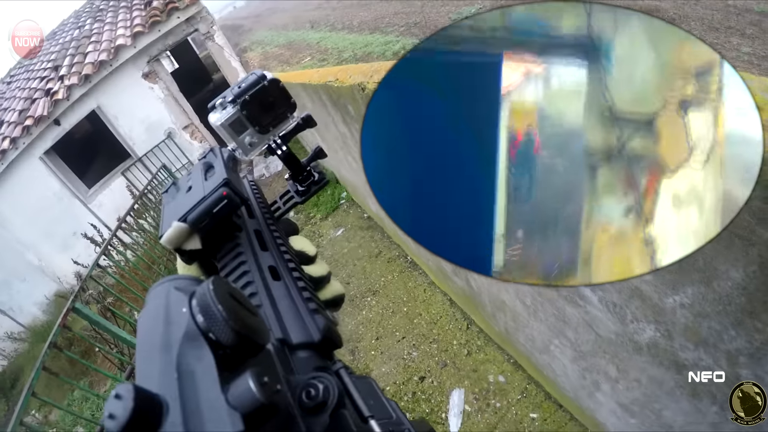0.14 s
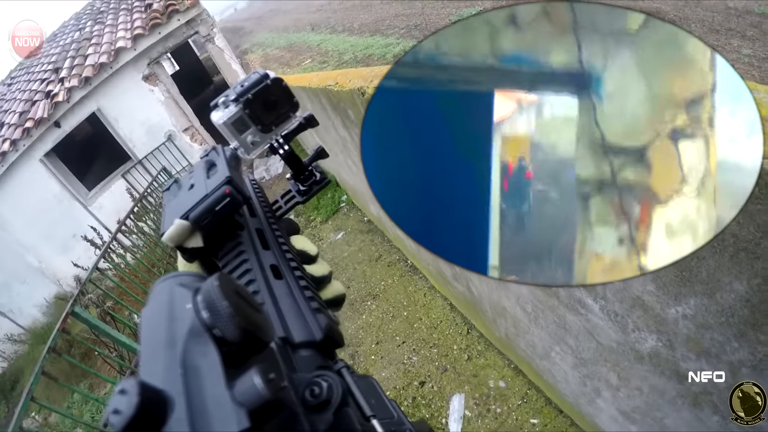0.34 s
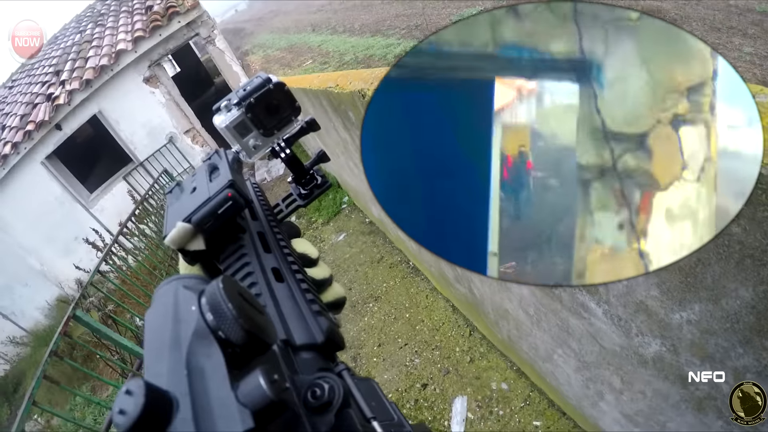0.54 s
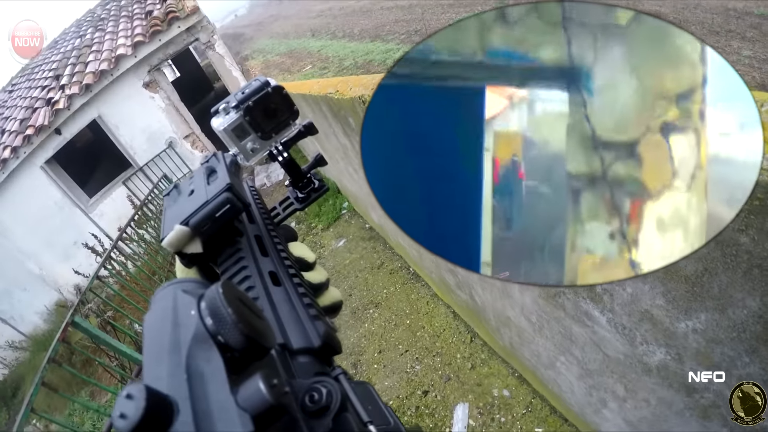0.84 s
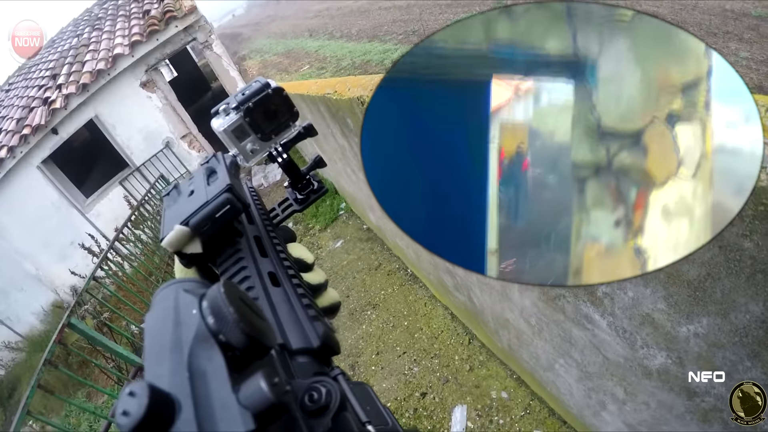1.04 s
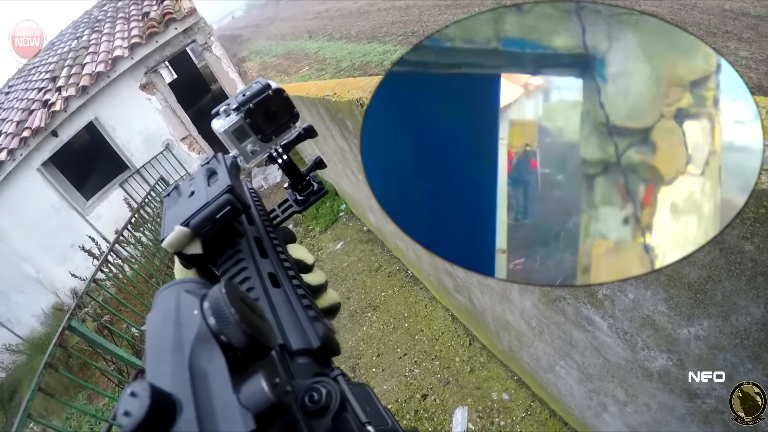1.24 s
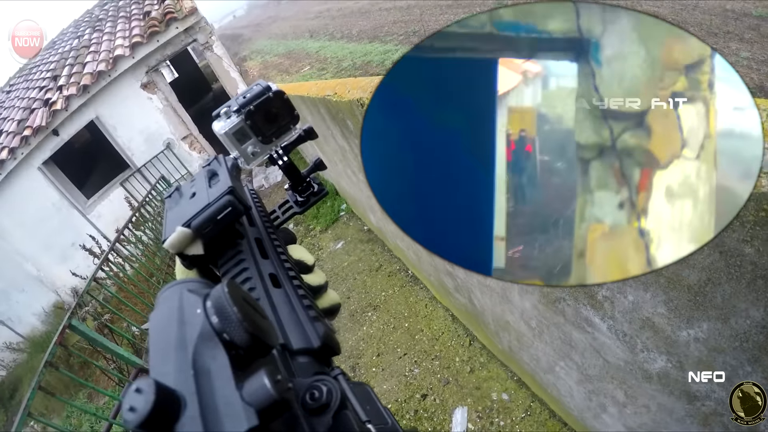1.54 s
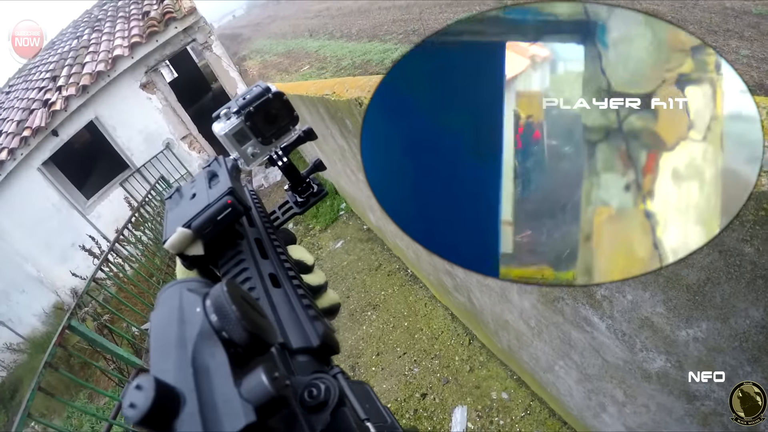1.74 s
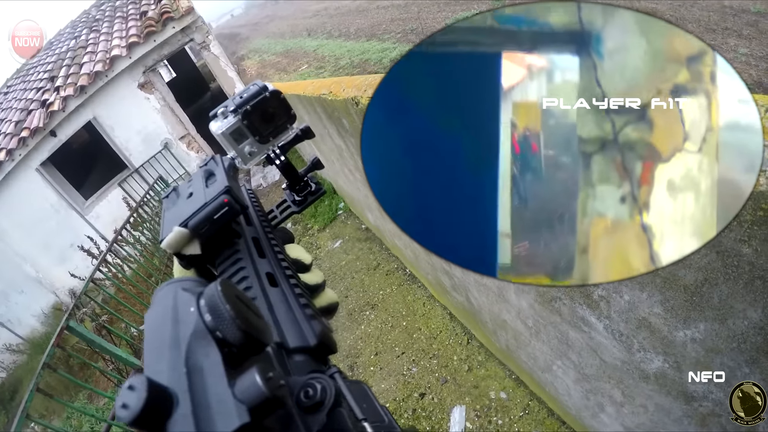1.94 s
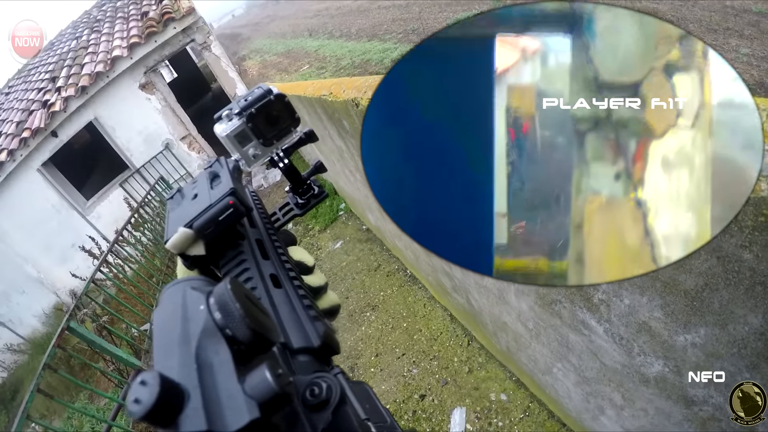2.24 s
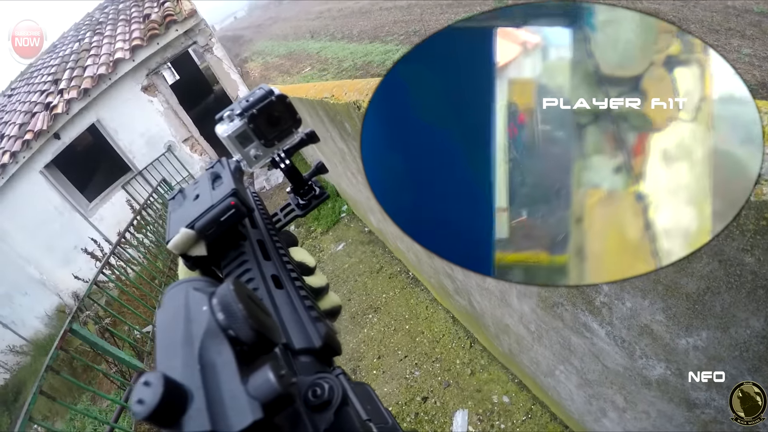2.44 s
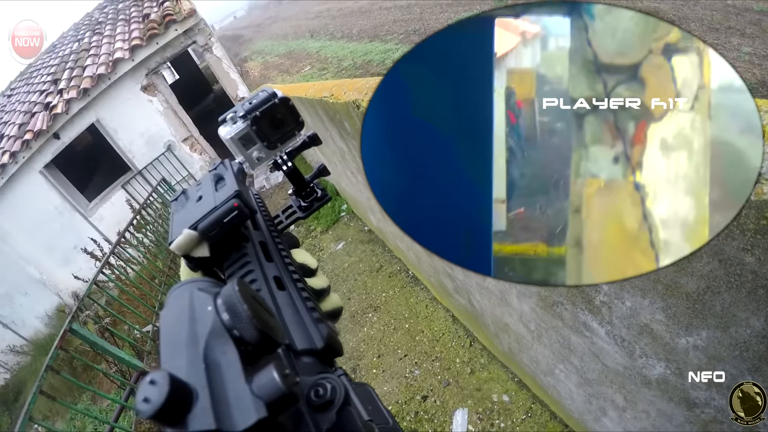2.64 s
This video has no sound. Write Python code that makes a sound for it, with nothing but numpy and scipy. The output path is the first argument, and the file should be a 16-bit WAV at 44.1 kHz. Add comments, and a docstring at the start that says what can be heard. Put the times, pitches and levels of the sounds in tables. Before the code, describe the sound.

Close by in a yard, an electric airsoft rifle snaps off a fast run of shots, stops for a moment, then fires five more. Gears whir and the piston slams each time, with a faint echo and soft handling bumps.

```python
"""Airsoft rifle in a yard

An electric airsoft rifle fires thirteen quick shots close by, with one short pause. In each cycle
the motor spins up, the gears drag the piston back along its toothed rack and let it go: the spring
zings, the gun recoils and the piston slams home. The trigger ticks between shots and one clack cuts in.
Walls and ground give a faint return, over low outdoor rumble and soft handling bumps."""
import sys
import numpy as np
from scipy import signal
from scipy.fft import rfft, irfft
from scipy.io import wavfile
from scipy.ndimage import uniform_filter1d

SR = 44100
rng = np.random.default_rng(int(sys.argv[2]) if len(sys.argv) > 2 else 0)


def waveform_to_disk(signal):
    """Save audio, clipped to [-1, 1], as 16-bit WAV at the path in sys.argv[1]."""
    frames = np.transpose(np.atleast_2d(signal))
    scaled = np.clip(frames, -1, 1) * 32767
    samples = np.round(scaled).astype(np.int16)
    wavfile.write(sys.argv[1], SR, samples)


N = 123479

# The firing pattern. Each row: piston slam time in seconds, motor lead and rack lead in seconds,
# trims in dB for rack, recoil, slam and stock ring, start click level in dB, stopping hum trim in dB.
SHOTS = [(.3222, .078, .044, 4, 5, 4, 4, -28, -8), (.5659, .088, .040, 0, 0, 1, 1, -42, -1),
         (.7195, .084, .042, 1, 0, 0, 0, -44, -1), (.8967, .085, .042, 0, 0, 1, 2, -44, -1),
         (1.0614, .084, .042, 0, -1, 0, 0, -36, 0), (1.2247, .085, .042, 0, -1, 0, -2, -44, 0),
         (1.3823, .085, .042, 0, -1, 0, -1, -44, 0), (1.5565, .084, .042, -1, -2, -1, -2, -42, 0),
         (1.8755, .087, .044, 2, 1, 2, 5, -35, -14), (2.043, .073, .037, 1, 1, 0, 3, -40, 0),
         (2.2393, .086, .042, 0, 1, 1, -1, -44, 0), (2.438, .085, .042, 0, 0, 1, 0, -34, -1),
         (2.6231, .085, .042, 1, 0, 0, -1, -39, 0)]
# Tone of the motor's starting click. Each row: frequency in Hz, relative level in dB.
START_CLICK_EQ = [(60, -23.5), (300, -2.5), (800, 7.5), (1500, -1), (3200, -5.5), (5000, -12.5),
                  (8000, -18.5), (10000, -35), (15000, -37.5)]
# Tone of the released spring. Each row: frequency in Hz, relative level in dB.
ZING_EQ = [(300, 0), (1000, -6), (2200, -14), (2650, -2.5), (3550, -2.5), (4150, -12.5), (4800, -33),
           (9000, -27.5), (15000, -59.5)]
# Ring of the stock and receiver. Each row: frequency in Hz, level before trim in dB, t60 in seconds.
STOCK_MODES = [(108, -49, 0.22), (272, -25, 0.1), (320.3, -18, 0.037), (627, -26, 0.11), (733, -12, 0.046),
               (848, -22, 0.072), (985, -19.5, 0.056)]
# The spring's thin after-ring. Each row: frequency in Hz, level before trim in dB, t60 in seconds.
SPRING_MODES = [(9790, -65.5, 0.48), (11670, -24, 0.04), (12100, -23, 0.049), (13200, -23, 0.037)]
def rifle():
    """Each cycle winds up, lets go and slams; the hard contacts all sound through the gearbox shell."""
    metal, body = np.zeros((2, N))
    for hit, motor_lead, rack_lead, rack_db, recoil_db, slam_db, stock_db, click_db, stop_db in SHOTS:
        start, release, flight_s = hit - motor_lead, hit - .021, .0224
        add(metal, start, strike(START_CLICK_EQ, click_db, hold_s=.0013, decay_s=.0049))
        add(metal, start, motor(release - start))
        add(body, start, grip_hum(length_s=.042, db=-31.5))
        add(metal, hit - rack_lead, rack(rack_db))
        add(metal, release, strike(TICK_EQ, db=-19, hold_s=.00089, decay_s=.0032))
        add(body, hit - flight_s, recoil(flight_s, recoil_db))
        add(metal, hit - .0138, strike(ZING_EQ, db=-16.5, hold_s=.0062, decay_s=.0012))
        add(metal, hit, slam(slam_db))
        add(body, hit, ring(STOCK_MODES, stock_db, detune=.01))
        add(body, hit, ring(SPRING_MODES, slam_db, detune=.00049))
        add(metal, hit + .0215, strike(GEAR_EQ, db=-25, hold_s=.0025, decay_s=.002))  # bounce
        add(body, hit + .029, grip_hum(length_s=.026, db=-31 + stop_db))
    trigger(metal)
    clack(metal)
    return shell(metal) + body


# Tone of the piston's crack. Each row: frequency in Hz, relative level in dB.
SLAM_EQ = [(120, -25), (300, -0.5), (440, -8.5), (700, 0), (1000, -5), (1500, -10.5), (2200, -10),
           (3150, -2), (4200, -11.5), (4900, -9), (7500, -12), (9000, -17), (10200, -10), (11000, -21),
           (12500, -12), (15000, -18)]
def slam(trim_db):
    """The piston head cracks into the cylinder and the loose parts shiver."""
    hold_s, crack_decay_s, shiver_decay_s = .0044, .00061, .011
    after_hold = clock(.07) - hold_s
    crack = np.exp(-np.maximum(after_hold, 0) / crack_decay_s)
    shiver = amp(-10.5) * np.exp(-after_hold / shiver_decay_s)
    return amp(-12 + trim_db) * colour(chatter(np.maximum(crack, shiver)), SLAM_EQ)


def recoil(length_s, trim_db):
    """The piston's flight shoves the gun to and fro once."""
    thump_hz, rise_s, fall_s = 119, .00375, .005
    t = clock(length_s) - length_s / 2
    width = np.where(t < 0, rise_s, fall_s)
    shove = np.exp(-.5 * (t / width) ** 2) * signal.windows.tukey(len(t), .45)
    return amp(-11.3 + trim_db) * np.cos(2 * np.pi * thump_hz * t) * shove


# Tone of the rack's clatter. Each row: frequency in Hz, relative level in dB.
RACK_EQ = [(150, -18.5), (420, -11.5), (680, 4.5), (950, -10.5), (1400, -8), (1750, 0.5), (2200, -15),
           (3300, -0.5), (4200, -11.5), (5000, -5), (7500, -10.5), (10200, -5.5), (11000, -14.5),
           (12500, -8), (15000, -15)]
def rack(trim_db):
    """The piston's teeth clatter over the gear, hardest in mid stroke."""
    tooth_s, tooth_decay_s, peak_s, width_s = .0058, .0012, .0092, .0073
    t = clock(.03)
    since_tooth = np.cumsum(1 + .35 * drift(len(t), size=100)) / SR % tooth_s
    teeth = evened(.33 + np.exp(-since_tooth / tooth_decay_s))
    stroke = np.exp(-.5 * ((t - peak_s) / width_s) ** 2 + .26 * drift(len(t), size=12))
    return amp(-21 + trim_db) * colour(chatter(stroke * teeth), RACK_EQ)


# Tone of gear grit, also used for rattles. Each row: frequency in Hz, relative level in dB.
GEAR_EQ = [(60, -23.5), (200, -10.5), (420, -1.5), (600, 4), (1000, 5.5), (1400, 2), (2200, -1), (3200, 2),
           (4100, -2), (5000, -3), (7700, -8), (9000, -21), (11000, -19), (15000, -30)]
def motor(run_s):
    """Gear whine and tooth grit rise with speed, then die as the motor brakes."""
    mesh_hz, spin_up_s, brake_hz_per_s = 1839, .017, 16000
    load_at_s, load_fade_s = .034, .013
    grit_rise_s, coast_db_per_s = .048, 250
    t = clock(run_s + .085)
    coast = np.maximum(t - run_s, 0)
    hz = np.maximum(mesh_hz * (1 - np.exp(-t / spin_up_s)) - brake_hz_per_s * coast, 0)
    phase = 2 * np.pi * np.cumsum(hz * (1 + .02 * drift(len(t), size=60))) / SR
    tone = np.sin(phase) + amp(-4) * (np.sin(2 * phase) + .57 * np.sin(3 * phase))
    # The whine swells as the gears take up the load.
    load = np.minimum(t / load_at_s, 1) ** 6 * np.exp(-np.maximum(t - load_at_s, 0) / load_fade_s)
    whine = amp(-28.5 + rng.standard_normal()) * np.sqrt(2) * tone * load * np.exp(-coast / .016)
    grain = np.exp(.33 * drift(len(t), size=30))
    grit = evened(chatter(grain * (1 + .31 * np.cos(phase))))
    grit *= amp(-11.5 * np.maximum(1 - t / grit_rise_s, 0) - coast_db_per_s * coast)
    grit *= np.minimum(t / .008, 1)
    return whine + amp(-28) * colour(grit, GEAR_EQ)[:len(t)]


def grip_hum(length_s, db):
    """The grip hums at its resonance while the motor speeds up or slows down."""
    resonance_hz, wobble = 699.4, .066
    t = clock(length_s)
    phase = 2 * np.pi * np.cumsum(resonance_hz * (1 + wobble * drift(len(t), size=70))) / SR
    swell = np.sin(np.pi * t / length_s) ** .5
    roughness = 1 + .49 * drift(len(t), size=120)
    return amp(db) * np.sqrt(2) * np.sin(phase) * swell * roughness


# Ring of the gearbox shell. Each row: frequency in Hz, relative level in dB, t60 in seconds.
SHELL_MODES = [(1700, -7.5, 0.069), (3157, -4, 0.031), (3547, 2, 0.02), (4850, 6.5, 0.034), (5450, 0, .05),
               (7030, -1, .06), (7870, 7.5, 0.02), (9870, 8, 0.29), (11820, 15.5, 0.062), (12400, -5, .08),
               (13000, 12, 0.04), (14100, 4, .05)]
def shell(contacts):
    """Everything in the gearbox rings its metal shell."""
    t, out = clock(.25), contacts.copy()
    for hz, db, t60 in SHELL_MODES:
        fade = amp(-60 * t / t60)
        mode = amp(db) * fade / fade.sum() * np.cos(2 * np.pi * hz * t)
        out += signal.fftconvolve(contacts, mode)[:N]
    return out


# Trigger and catch cues. Each row: start in seconds, level in dB.
TICK_CUES = [(0.4111, -34), (0.622, -30.5), (0.7826, -30), (0.9566, -31.5), (1.1236, -33.5), (1.2874, -31),
             (1.4458, -35), (1.6139, -31.5), (1.6375, -39), (1.7352, -41), (1.776, -72), (2.1465, -33),
             (2.312, -30), (2.32, -33), (2.4946, -34), (2.5189, -31.5), (2.681, -32), (2.7058, -34)]
# Tone of a tick, and of the piston's release. Each row: frequency in Hz, relative level in dB.
TICK_EQ = [(60, -40.5), (200, -9.5), (420, -2), (700, 2), (1200, -5), (1600, -4.5), (2100, -10),
           (3300, -7.5), (4100, -15.5), (5000, -11), (7500, -17), (9000, -25), (15000, -27)]
def trigger(mix):
    """The trigger and catch tick lightly between shots."""
    for start, db in TICK_CUES:
        add(mix, start, strike(TICK_EQ, db, hold_s=.0015, decay_s=.0046))


# The lone clack's cue: start in seconds, level in dB.
CLACK_CUE = (1.970, -16)
# Tone of the clack. Each row: frequency in Hz, relative level in dB.
CLACK_EQ = [(80, -26), (300, -1), (800, 0), (2000, -11), (3100, 1), (3600, 0), (4200, -4), (5000, -25),
            (7500, -7), (9000, -24), (15000, -28)]
def clack(mix):
    """One sharp clack rattles on into the next wind-up."""
    start, db = CLACK_CUE
    add(mix, start, strike(CLACK_EQ, db, hold_s=.0021, decay_s=.0014))
    add(mix, start, strike(GEAR_EQ, db - 13.5, hold_s=.045, decay_s=.006))


# The yard's reverb time. Each row: frequency in Hz, t60 in seconds.
YARD_DECAY = [(100, 0.4), (300, 0.57), (500, 0.27), (1500, 0.36), (4000, 0.36), (8000, 0.23), (15000, 0.04)]
def yard(gun):
    """Walls and ground scatter back a faint tail."""
    hz, t, noise = signal.stft(rng.standard_normal(SR), SR, nperseg=256)
    envelope = amp(-60 * t / read(YARD_DECAY, hz)[:, None]) * np.minimum(t / .012, 1)
    tail = signal.istft(noise * envelope, SR, nperseg=256)[1]
    return amp(-25) * signal.fftconvolve(gun, tail / np.linalg.norm(tail))[:N]


# Tone of the outdoor bed. Each row: frequency in Hz, relative level in dB.
AIR_EQ = [(15, -28.5), (28, -11), (45, -5), (80, -12), (150, -16.5), (300, -21.5), (600, -30.5),
          (1700, -30), (4000, -41), (8000, -50), (15000, -63)]
# Handling cues. Each row: start in seconds, level in dB.
BUMP_CUES = [(0.045, -41), (0.072, -43), (.135, -39), (0.399, -37.5), (2.681, -43), (2.729, -44)]
# Dull tone of a bump. Each row: frequency in Hz, relative level in dB.
BUMP_EQ = [(25, -4), (80, 1), (130, -5), (260, -8), (450, -26), (1500, -32), (5000, -75)]
def air_and_handling():
    """Low outdoor rumble swells gently under soft bumps of handling."""
    spectrum = rfft(rng.standard_normal(N)) * amp(read(AIR_EQ, np.fft.rfftfreq(N, 1 / SR)))
    bed = evened(irfft(spectrum, N)) * amp(-50.5 - 1.5 * drift(N, size=3000))
    t, rise_s = clock(.06), .0074
    bump = t / rise_s * np.exp(1 - t / rise_s)
    for start, db in BUMP_CUES:
        add(bed, start, amp(db) * colour(chatter(bump), BUMP_EQ))
    return bed


def strike(eq, db, hold_s, decay_s):
    """A short contact: instant attack, hold, quick release."""
    envelope = np.exp(-np.maximum(clock(.043) - hold_s, 0) / decay_s)
    return amp(db) * colour(chatter(envelope), eq)


def ring(modes, trim_db, detune):
    """A struck part's modes die away, tuned slightly differently at each blow."""
    t, out = clock(.4), 0
    for hz, db, t60 in modes:
        pitch = hz * (1 + detune * rng.standard_normal())
        out += amp(db + trim_db - 60 * t / t60) * np.sin(2 * np.pi * pitch * t)
    return out


def chatter(envelope):
    """Dense micro-impacts of random sign under an envelope."""
    return envelope * rng.choice([-1., 1.], len(envelope))


def colour(x, eq):
    """Applies an EQ curve as a causal filter of unit energy."""
    log_gain = np.log(amp(read(eq, abs(np.fft.fftfreq(2048, 1 / SR)))))
    taps = np.fft.ifft(np.exp(np.conj(signal.hilbert(log_gain)))).real  # minimum phase
    return signal.fftconvolve(x, taps / np.linalg.norm(taps))


def drift(count, size):
    """A random wander of rms 1, smoothed twice over size samples."""
    return evened(uniform_filter1d(uniform_filter1d(rng.standard_normal(count), size), size))


def read(points, hz):
    """Reads a curve on a log-frequency axis."""
    f, value = np.transpose(points)
    return np.interp(np.log(hz + 1), np.log(f + 1), value)


def amp(db):
    """Decibels to gain."""
    return 10 ** (np.asarray(db) / 20)


def evened(x):
    """Scales to rms 1."""
    return x / np.sqrt(np.mean(x ** 2) + 1e-20)


def clock(length_s):
    """Time axis in seconds."""
    return np.arange(int(length_s * SR)) / SR


def add(mix, start_s, sound):
    """Drops a sound into the mix at its cue."""
    part = mix[max(round(start_s * SR), 0):][:len(sound)]
    part += sound[:len(part)]


def scene():
    """The rifle in its yard, in mono."""
    gun = rifle()
    return (gun + yard(gun) + air_and_handling())[None]


def record(dry):
    """A soft clip rounds the loudest peaks, then a low-pass trims the top."""
    ceiling, cutoff_hz = .85, 15500
    rounded = dry / (1 + (dry / ceiling) ** 4) ** (1 / 4)
    lowpass = signal.firwin(161, cutoff_hz, window=("kaiser", 9), fs=SR)
    return signal.oaconvolve(rounded, lowpass[None], "same")


dry = scene()
out = record(dry)
waveform_to_disk(out)
```